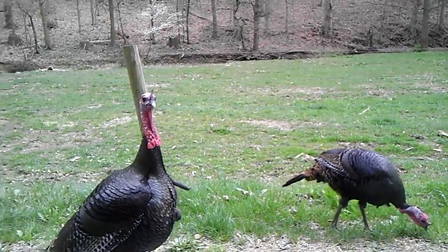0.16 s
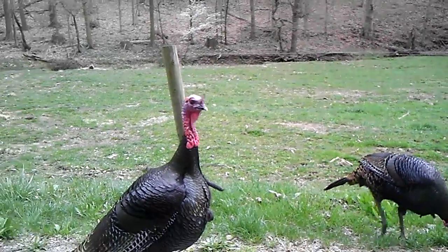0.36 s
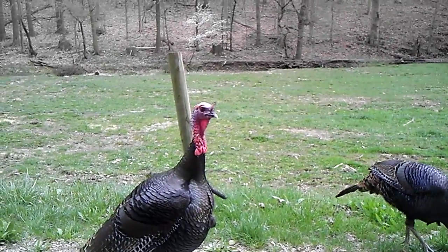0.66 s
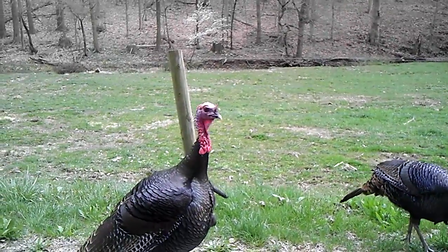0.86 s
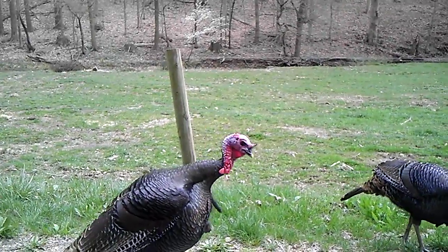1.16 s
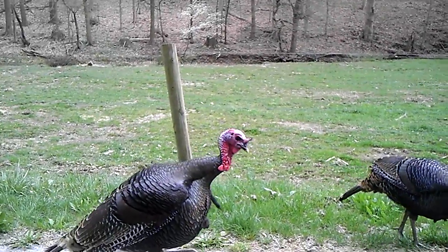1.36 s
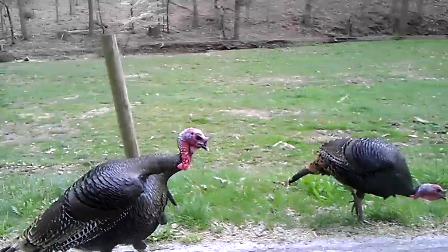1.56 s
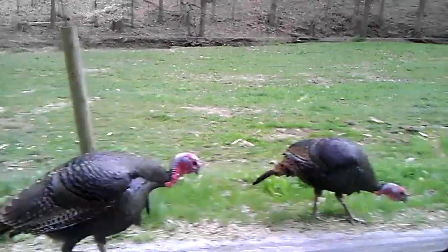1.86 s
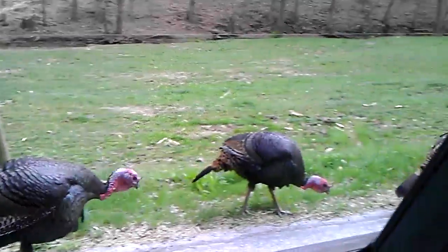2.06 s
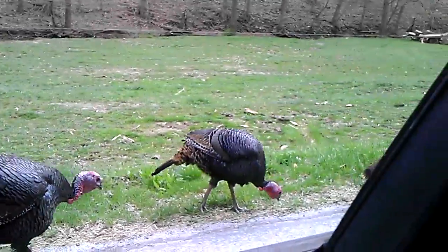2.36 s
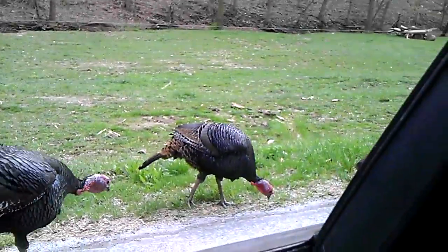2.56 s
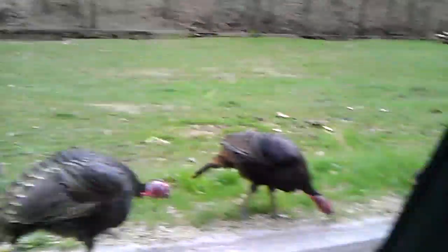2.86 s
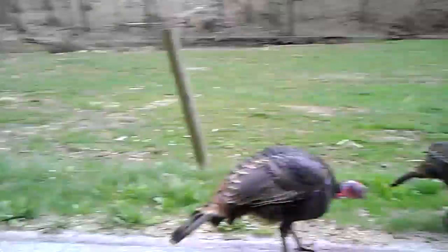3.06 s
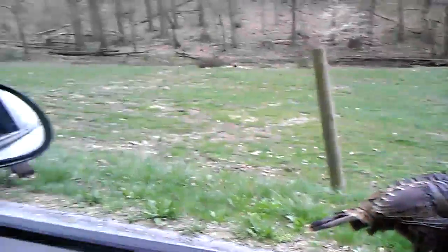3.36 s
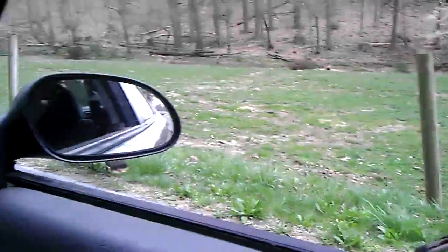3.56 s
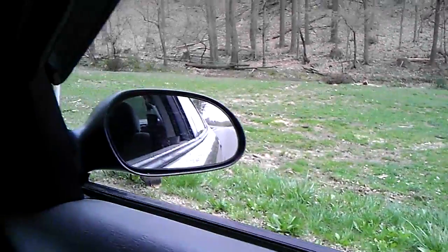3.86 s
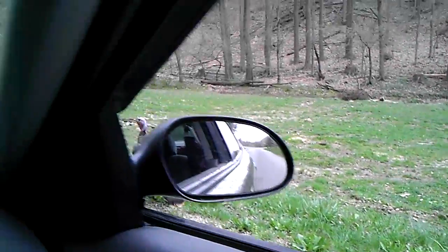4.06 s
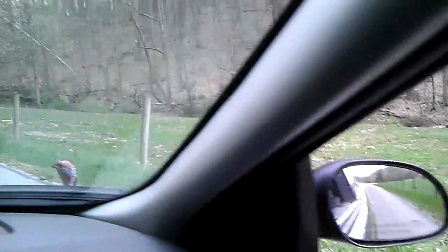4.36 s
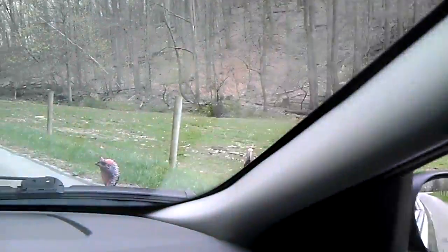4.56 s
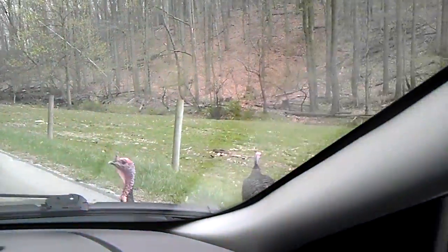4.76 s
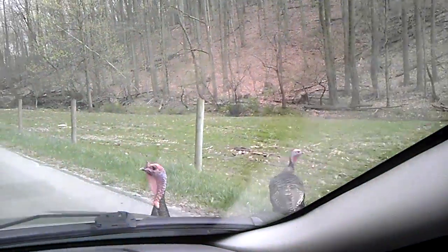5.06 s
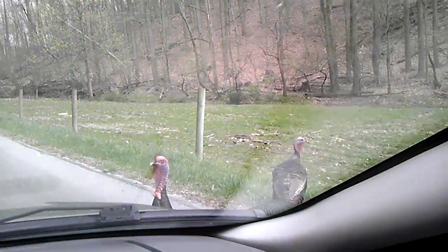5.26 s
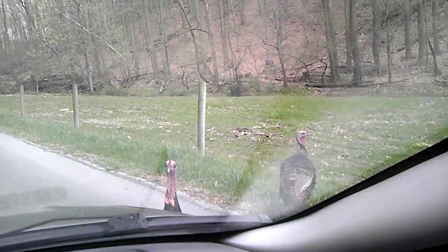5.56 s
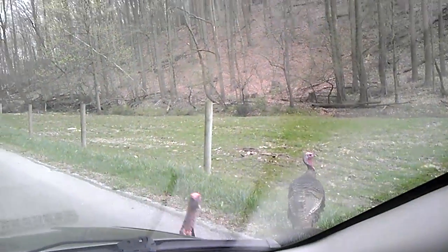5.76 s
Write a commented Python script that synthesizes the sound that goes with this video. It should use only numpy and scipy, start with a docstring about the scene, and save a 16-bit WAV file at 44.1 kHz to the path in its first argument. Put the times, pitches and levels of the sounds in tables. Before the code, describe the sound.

A soft low engine idle, slowly throbbing, and a bed of rumble and faint hiss last the whole six seconds, heard from a car with an open window. From 0.4 to 1.2 s a nearby turkey gives three pairs of calls: a sharp upward yelp, then a falling, warbling, slightly raspy whistle; the middle yelp is strongest. A very thin high electronic whine begins around 1.2 s. Small handling ticks and light rubbing start at 1.9 s, with a clearer click at 2.4 s. At 2.5 s comes the loudest gobble: two slurs, then five quick cracking two-pitched notes until 2.9 s, with clicks amid them. Close rustling and a knock on the right peak near 3.0 s. At 4.2 s a weaker, more reflected gobble has two slurs and four rattling notes, leaving a faint ring around 1.3 kHz. A small tick follows at 4.6 s, then quiet idle until the end.

```python
"""By a road, from an idling car with a window open: wild turkeys outside gobble three times.
The first gobble alternates rising yelps and falling slurs, swept tones with an octave and some rasp.
The others open with two slurs and break into a rattle of two-pitched notes, 18 a second; a faint ring lingers.
The engine is a stack of sines; the hand-held camera ticks and rustles in shaped noise as it is turned.
Behind lie a bed of rumble and hiss, and a thin whine of the camera's electronics."""
import sys
import numpy as np
from scipy import signal
from scipy.fft import rfft, irfft
from scipy.io import wavfile
from scipy.ndimage import uniform_filter1d

SR = 44100
rng = np.random.default_rng(int(sys.argv[2]) if len(sys.argv) > 2 else 0)


def transcribe(u):
    """Save the signal u as a 16-bit wav file named by the first command-line argument.

    u: samples, shape (n,) or (channels, n), limited to [-1, 1]; the rate is SR.
    q: integer samples, one column per channel.
    """
    v = np.clip(np.atleast_2d(u).T, -1, 1)
    q = np.round(v * 32767).astype(np.int16)
    wavfile.write(sys.argv[1], SR, q)


N = 260631
TIME = np.arange(N) / SR  # seconds


def amp(db):
    """Decibels to gain."""
    return 10 ** (np.asarray(db) / 20)


def unit(x):
    """Scales to rms 1."""
    return x / np.sqrt(np.mean(x ** 2) + 1e-20)


def curve(rows, t=TIME):
    """Reads (s, value) rows at the times t."""
    return np.interp(t, *np.transpose(rows))


def across(points, hz):
    """Reads (Hz, value) rows on a log-frequency axis."""
    f, value = np.transpose(points)
    return np.interp(np.log(hz + 1), np.log(f + 1), value)


def add(mix, s, sound):
    """Mixes a sound in at time s."""
    part = mix[..., round(s * SR):][..., :sound.shape[-1]]
    part += sound[..., :part.shape[-1]]


def drift(hz):
    """Slow chance of rms 1, moving up to about hz times a second."""
    f = np.fft.rfftfreq(N, 1 / SR)
    noise = rfft(rng.standard_normal(N))
    return unit(irfft(noise * np.exp(-(f / hz) ** 2), N))


def coloured(x, points):
    """Filters by a (Hz, dB) spectrum."""
    gain = amp(across(points, np.fft.rfftfreq(N, 1 / SR)))
    return irfft(rfft(x) * gain, N)


def latest(notes):
    """For every moment: the time since the latest note began, and that note's other columns."""
    s, *columns = np.transpose(notes)
    row = np.maximum(np.searchsorted(s, TIME) - 1, 0)
    return TIME - s[row], *(c[row] for c in columns)


def arch(u):
    """Half a sine as u goes from 0 to 1, zero outside."""
    return np.sin(np.pi * np.clip(u, 0, 1)) * (u < 1)


def syrinx(hz, gain, octave, rough, third_db=-24):
    """A nearly pure, slightly unsteady tone with its octave and a trace of the twelfth."""
    phase = 2 * np.pi * np.cumsum(hz * (1 + rough * drift(340.4))) / SR
    overtones = octave * (np.sin(2 * phase) + amp(third_db) * np.sin(3 * phase))
    wave = gain * np.sin(phase) + overtones
    return np.sqrt(2) * (1 + 3 * rough * drift(270)) * wave


def rasp(low_hz=800, high_hz=2700, slope=3):
    """Turbulence in the bird's voice box: noise of rms 1 in a band."""
    f = np.fft.rfftfreq(N, 1 / SR) + 1
    band = 1 + (low_hz / f) ** (2 * slope) + (f / high_hz) ** (2 * slope)
    return unit(irfft(rfft(rng.standard_normal(N)) / band, N))


# Yelps outside the window, flung upwards. Each row: start in seconds, length in seconds, top pitch in Hz,
# attack level in dB, tail level in dB, level of the reedy octave in dB.
YELP_NOTES = [(0.3925, 0.0395, 1484, -27.5, -36, -48), (0.7565, 0.035, 1848, -18.5, -44, -39.5),
              (1.0375, 0.036, 1590, -30.5, -48, -55)]
YELP_FROM_HZ, YELP_RISE_HZ_PER_S, YELP_SAG_HZ_PER_S = 928, 54000, 3500
YELP_ATTACK_S, YELP_FADE_DB_PER_S = 0.0038, 1100


def yelps(rough=0.015, octave_db=-32, rasp_db=-46, third_db=-17):
    """A sharp attack shoots up in pitch, then frays into a weak, reedy, raspy tail."""
    t, length, top_hz, attack_db, tail_db, reedy_db = latest(YELP_NOTES)
    t = np.clip(t, 0, length)
    rise_s = (top_hz - YELP_FROM_HZ) / YELP_RISE_HZ_PER_S
    rising_hz = YELP_FROM_HZ + YELP_RISE_HZ_PER_S * t
    sagging_hz = top_hz - YELP_SAG_HZ_PER_S * (t - rise_s)
    hz = np.minimum(rising_hz, sagging_hz)
    fading_db = attack_db - YELP_FADE_DB_PER_S * np.maximum(t - YELP_ATTACK_S, 0)
    attack = np.minimum(t / YELP_ATTACK_S, 1) * amp(fading_db) * (t < length)
    tail = arch(t / length)
    reedy = amp(reedy_db) * arch((t - rise_s / 2) / (length - rise_s / 2)) ** 2
    gain = np.hypot(attack, amp(tail_db) * tail)
    tone = syrinx(hz, gain, reedy + amp(octave_db) * attack, rough, third_db)
    return tone + amp(rasp_db) * tail * rasp(high_hz=1570)


# Slurs outside the window, in two parts with a catch of the voice between. Each row: start in seconds,
# first part in seconds, second part in seconds, pitch before the warble at the start, the catch and the end
# in Hz, first level in dB, second level in dB, level of the reedy octave in dB, warble as a share of the pitch.
SLUR_NOTES = [(0.495, 0.05, 0.11, 1293, 1105, 780, -30, -35.5, -70, 0.063),
              (0.852, 0.038, 0.035, 1330, 1040, 800, -25.5, -32, -61, 0.074),
              (1.148, 0.016, 0.033, 1350, 1100, 930, -27.5, -25, -51.5, 0.046),
              (2.534, 0.018, 0.029, 872, 1250, 1180, -32, -30, -40.5, 0.01),
              (2.606, 0.02, 0.018, 1065, 1220, 1250, -25.5, -38, -46, 0.0084),
              (4.190, 0.019, 0.039, 892, 1280, 1020, -43, -45, -51.5, 0.018),
              (4.270, 0.01, 0.022, 1053, 1140, 1290, -41, -39, -44, 0.02)]
WARBLE_HZ, WARBLE_FADE_S, WARBLE_DIP = 41.35, 0.095, 0.12  # pitch and level shake together
REEDY_LAG_S, REEDY_S = 0.014, 0.048  # just after the catch the voice turns reedy
SLUR_ATTACK_S, SLUR_RELEASE_S, CATCH_DIP, CATCH_S = 0.0095, 0.013, 0.44, 0.003


def slurs(rough=0.013, octave_db=-38, rasp_db=-7):
    """Whistles that slide and warble; each catches once and goes on with an octave and some rasp."""
    t, first_s, second_s, start_hz, catch_hz, end_hz, first_db, second_db, reedy_db, warble = latest(SLUR_NOTES)
    after = t - first_s  # time from the catch
    first, second = np.clip(t / first_s, 0, 1), np.clip(after / second_s, 0, 1)
    warble_fade = np.exp(-np.maximum(after, 0) / WARBLE_FADE_S)  # less after the catch
    shake = -np.cos(2 * np.pi * WARBLE_HZ * after) * warble_fade
    slide_hz = start_hz + (catch_hz - start_hz) * first + (end_hz - catch_hz) * second
    hz = slide_hz * (1 + warble * shake)
    envelope = np.clip(np.minimum(t / SLUR_ATTACK_S, (second_s - after) / SLUR_RELEASE_S), 0, 1)
    level_db = first_db + (second_db - first_db) * (1 + np.tanh(after / CATCH_S)) / 2
    catch = 1 - CATCH_DIP * np.exp(-(after / CATCH_S) ** 2)
    gain = envelope * amp(level_db) * (1 + WARBLE_DIP * shake) * catch
    reedy = envelope * amp(reedy_db) * arch(.5 + (after - REEDY_LAG_S) / REEDY_S) ** 2
    tone = syrinx(hz, gain, reedy + amp(octave_db) * gain, rough)
    return tone + amp(rasp_db) * reedy * rasp()


# Rattle notes outside the window. Each row: voice break in seconds, low pitch in Hz, low level in dB,
# high pitch in Hz, high level in dB; the pitch sags and the levels are trimmed in the function.
RATTLE_NOTES = [(2.677, 1109, -18, 1628, -30), (2.7325, 1040, -14.5, 1657, -28.5),
                (2.785, 1037, -14, 1735, -37), (2.8407, 1036, -12, 1692, -31.5),
                (2.895, 1113, -16.5, 1710, -31.5), (4.344, 1119, -39, 1650, -37.5),
                (4.399, 1024, -28, 1713, -33.5), (4.451, 1012, -23, 1739, -33.5),
                (4.503, 1050, -29, 1770, -37.5)]


def rattle(swell_s=0.0125, high_s=0.016, low_db=-3.5, high_db=1, held_db=-14, middle_db=-15,
           sum_db=-18, rasp_db=-15, rough=0.023, sag_hz_per_s=5000):
    """Each note swells on its low pitch, sagging a little, then breaks into three tones at once, with some rasp."""
    s, *columns = np.transpose(RATTLE_NOTES)
    nearest = np.searchsorted((s[1:] + s[:-1]) / 2, TIME)
    low_hz, low, high_hz, high = (c[nearest] for c in columns)
    t = TIME - s[nearest]  # time from the break
    leap_s = .0022
    swell = np.where(t < 0, np.clip(1 + t / swell_s, 0, 1), np.exp(-abs(t) / leap_s))
    broken = np.interp(t, [-leap_s / 2, leap_s, high_s / 2, high_s], [0, 1, 1, 0])
    middle_hz = (low_hz + high_hz) / 2
    leap_hz = middle_hz + np.clip(t / leap_s, -1, 1) * (high_hz - middle_hz)
    sag_hz = sag_hz_per_s * (np.minimum(abs(t), swell_s) - swell_s / 4)
    low_gain = amp(low + low_db) * (swell + amp(held_db) * broken)  # the low pitch carries on weakly
    high_gain = amp(high + high_db) * broken
    sound = syrinx(low_hz + sag_hz, low_gain, amp(-30) * low_gain, rough / 2)
    sound += syrinx(leap_hz, high_gain, amp(-22.0) * high_gain, rough)
    sound += syrinx(middle_hz, amp(low + middle_db) * broken, 0, rough * 2)
    # while both pitches are strong, they mix into a tone at their sum
    sum_gain = amp(sum_db) * high_gain * np.exp(-abs(t) / 0.0093)
    sound += syrinx(low_hz + high_hz, sum_gain, 0, rough)
    return sound + amp(rasp_db) * high_gain * rasp()


def cabin(x, t60=0.045, far_db=-13, far_t60=1.0):
    """Quick reflections inside the car and a faint tail from the wooded slope; decays in seconds."""
    t = np.arange(SR // 2) / SR
    signs = rng.choice([-1., 1.], (2, len(t)))
    sparse = rng.random((2, len(t))) < 3000 / SR  # about 3000 reflections a second
    taps = signs * sparse * (t > .002)
    response = 0
    for db, decay in (0, t60), (far_db, far_t60):
        tail = taps * amp(-60 * t / decay)
        response = response + amp(db) * tail / np.linalg.norm(tail, axis=1, keepdims=True)
    return signal.fftconvolve(x[None], response, axes=1)[:, :N]


# Where the birds stand as the camera turns. Each row: time in seconds, lead of the left ear in ms,
# left-right difference in dB, reflections in dB against the direct sound.
BIRD_BEARING = [(1.2, 0.075, 0.5, -10.5), (2.549, 0.075, -5, -9), (2.75, 0.12, 0.5, -11),
                (4.3, -0.13, -3.5, 3)]


def placed(x):
    """Sets the birds by delay and balance between the ears; reflections grow as the camera turns from the window."""
    s, *columns = np.transpose(BIRD_BEARING)
    lead_ms, balance_db, wet_db = (np.interp(TIME, s, c) for c in columns)
    lead = lead_ms / 1000
    direct = [np.interp(TIME + side * lead, TIME, x) * amp(side * balance_db) for side in (.5, -.5)]
    return (direct + cabin(x * amp(wet_db))) / np.sqrt(1 + amp(wet_db) ** 2)


# Swells of a faint ring around the last gobble. Each row: peak in seconds, level in dB.
RING_SWELLS = [(4.049, -59.5), (4.52, -50.5), (5.25, -67)]
LINGER_RISE_DB_PER_S, LINGER_FALL_DB_PER_S = 105, 32


def linger(hz=1330, width_hz=95):
    """A narrow, fuzzy band of sound that dies away slowly, partly shared by the ears."""
    phase = 2 * np.pi * hz * TIME
    left, right, shared = (drift(width_hz) * np.cos(phase) + drift(width_hz) * np.sin(phase) for _ in range(3))
    level = 0
    for s, db in RING_SWELLS:
        drop_db = np.maximum(LINGER_RISE_DB_PER_S * (s - TIME), LINGER_FALL_DB_PER_S * (TIME - s))
        level = level + amp(db - drop_db)
    return level * (np.array([left, right]) + shared) / np.sqrt(2)


# Handling ticks close to the microphone. Each row: time in seconds, then the levels of the snap, the knock
# of the housing and the bright edge in dB, before colouring and left-right balance.
HANDLING_TICKS = [(1.930, -41, -47, -46), (2.3996, -28.5, -31.5, -44), (2.596, -27.5, -46, -67),
                  (2.733, -30, -38, -48.5), (3.0118, -34, -29, -44.5), (3.209, -48, -41, -41),
                  (4.593, -45, -39, -58)]
# Colour of the snap. Each row: frequency in Hz, gain in dB.
SNAP_COLOUR = [(300, -7), (900, 8.5), (1700, 11), (2600, -3), (3800, 3.5), (4800, -27), (13000, -37)]
# Colour of the bright edge. Each row: frequency in Hz, gain in dB.
EDGE_COLOUR = [(2500, -18), (4600, 3), (6500, -9), (9000, -5.5), (14000, -7)]
# Modes of the camera's housing. Each row: frequency in Hz, relative level in dB, 60 dB decay in seconds.
HOUSING_MODES = [(517, 0, 0.048), (900, -6.5, 0.037)]


def ticks():
    """A brief crackle of a snap with a bright edge, and the camera's housing knocks."""
    t = np.arange(SR // 16) / SR
    knock = sum(amp(db - 60 * t / t60) * np.sin(2 * np.pi * hz * t) for hz, db, t60 in HOUSING_MODES)
    burst = t * np.exp(-t / .0007)
    snaps, knocks, edges = np.zeros((3, N))
    for s, snap_db, knock_db, edge_db in HANDLING_TICKS:
        crackle = rng.standard_normal(len(t)) * burst / burst.max()
        add(snaps, s, amp(snap_db) * crackle)
        add(edges, s, amp(edge_db) * crackle)
        add(knocks, s, amp(knock_db) * knock)
    return coloured(snaps, SNAP_COLOUR) + coloured(edges, EDGE_COLOUR) + knocks


# Strokes of the hand on the camera. Each row: start in seconds, length in seconds, level in dB
# before left-right balance.
HAND_STROKES = [(1.915, 0.025, -52), (2.097, 0.11, -57), (2.898, 0.077, -53), (3.004, 0.12, -44),
                (3.135, 0.075, -59)]
# Colour of skin on the housing. Each row: frequency in Hz, relative level in dB per Hz.
SKIN_COLOUR = [(530, -43), (900, -15), (1130, -6), (1440, -4), (2230, -6), (2590, -6), (4340, -7),
               (5160, -16), (14000, -14.5)]
STROKE_ATTACK_S, STROKE_RELEASE_S = 0.019, 0.019


def rub(flutter=0.17):
    """Skin slides over the housing with a soft rustle; each stroke builds, holds and dies away."""
    rustle = rng.standard_normal((2, N)) * np.exp(flutter * drift(602))
    level = 0
    for s, length, db in HAND_STROKES:
        build = np.clip((TIME - s) / STROKE_ATTACK_S, 0, 1)
        release = np.exp(-np.maximum(TIME - s - length, 0) / STROKE_RELEASE_S)
        level = level + amp(db) * build * release
    both = rustle + 0.08 * rustle[::-1]  # a little of each side reaches the other
    return level * unit(coloured(both, SKIN_COLOUR))


# Higher orders of the idle. Each row: multiple of the firing rate, level in dB before the swing below.
IDLE_ORDERS = [(2, -66.5), (3, -62), (4, -59.5), (8, -61.5)]
IDLE_HZ = 34.6  # mean firing rate of the engine
# The deepest note of the idle waxes and wanes. Each row: time in seconds, level in dB before a small trim.
DEEP_THROB = [(0.0, -62), (0.15, -55.5), (1.18, -64.5), (2.48, -53.5), (3.04, -69), (3.25, -52),
              (3.65, -64.5), (5.62, -54), (5.9, -64)]
# The open window's middle range, least once the camera has turned away; it also steers the air below.
# Each row: time in seconds, change in dB before scaling.
WINDOW_OPENING = [(0, 1.5), (2.6, 2.25), (4.6, -1), (5.9, -2.5)]


def engine(wander=0.01005, throb=0.21, boom=0.8, deep_db=0.5):
    """Low orders of the idle, each waxing and waning; the upper ones boom more away from the window."""
    phase = 2 * np.pi * np.cumsum(IDLE_HZ * (1 + wander * drift(1.505))) / SR
    orders = 0
    for k, db in IDLE_ORDERS:
        throbbing = amp(db) * (1 + throb * drift(5.3))
        orders = orders + throbbing * np.sin(k * phase + rng.uniform(0, 2 * np.pi))
    deep = amp(curve(DEEP_THROB) + deep_db) * np.sin(phase)
    return np.sqrt(2) * (deep + amp(-boom * curve(WINDOW_OPENING)) * orders)


# Rumble of the car and outdoor air. Each row: frequency in Hz, relative level in dB per Hz.
AIR_COLOUR = [(24, -35), (45, -14.5), (80, -11), (130, -2.5), (210, -2), (265, -0.5), (320, -4),
              (520, -6.5), (800, -13.5), (1700, -22.5), (2350, -23), (3100, -29), (5000, -32),
              (6000, -40.5), (8500, -36), (14000, -32)]
AIR_DB = -44.5  # overall rms level
# How far each range follows the window. Each row: frequency in Hz, share of the change in dB.
OPENING_SHARE = [(250, -0.019), (600, 0.6), (2300, 1.82), (5000, 0.3), (9000, -0.031)]
# Likeness of the two ears. Each row: frequency in Hz, left-right correlation from 0 to 1.
EAR_LIKENESS = [(60, 1), (250, .93), (600, 0.71), (1200, 0.067), (2500, 0.33), (6000, 0.065),
                (14000, 0.106)]


def air(patchy_db=1.6):
    """Rumble and hiss with drifting patches, alike at both ears in the bass."""
    frames, hz = N // 512 + 5, np.fft.rfftfreq(2048, 1 / SR)
    a, b, c, d, patches = rng.standard_normal((5, frames, len(hz)))
    patches = uniform_filter1d(patches, size=8, axis=0)  # smooth in time
    patches = unit(uniform_filter1d(patches, size=16, axis=1))  # smooth in frequency
    same = np.clip(across(EAR_LIKENESS, hz), -1, 1)
    left = a + 1j * b
    right = same * left + np.sqrt(1 - same ** 2) * (c + 1j * d)
    opening_db = curve(WINDOW_OPENING, np.arange(frames) * 512 / SR)[:, None] * across(OPENING_SHARE, hz)
    gain = amp(across(AIR_COLOUR, hz) + opening_db + patchy_db * patches)
    z = np.array([left, right]) * gain / np.sqrt(1 + same)
    sound = signal.istft(z.transpose(0, 2, 1), nperseg=2048, noverlap=1536)[1][:, :N]
    return amp(AIR_DB) * unit(sound)


# Spells of the camera's whine. Each row: start in seconds, end in seconds, level in dB.
WHINE_SPELLS = [(1.201, 3.2, -74), (3.199, 5.892, -76), (3.95, 5.1, -78)]
WHINE_HZ = 12780  # mean pitch


def whine(waver_hz=14, fade_s=0.047):
    """A thin wavering tone of the electronics that comes and goes."""
    level = 0
    for start, end, db in WHINE_SPELLS:
        level = level + amp(db) * np.clip(np.minimum(TIME - start, end - TIME) / fade_s, 0, 1)
    phase = 2 * np.pi * np.cumsum(WHINE_HZ + waver_hz * drift(55.5)) / SR
    return np.sqrt(2) * level * np.sin(phase)


def scene(tick_room_db=-10, tick_side_db=5.0, rub_side_db=1):
    """The birds outside, handling noise close by on the right, the car all round."""
    right = np.array([[-1], [1]])  # lowers the left ear, raises the right
    tick = ticks()
    handling = (tick + amp(tick_room_db) * cabin(tick)) * amp(tick_side_db * right)
    handling = handling + rub() * amp(rub_side_db * right)
    birds = placed(yelps() + slurs() + rattle())
    return birds + handling + linger() + engine() + air() + whine()


EDGE_HZ = 14150  # top of the microphone's band


def record(dry):
    """The camera's band limit: a steep low-pass."""
    low_pass = signal.firwin(511, EDGE_HZ, window=("kaiser", 8), fs=SR)
    return signal.oaconvolve(dry, low_pass[None], "same")


dry = scene()
out = record(dry)
transcribe(out)
```